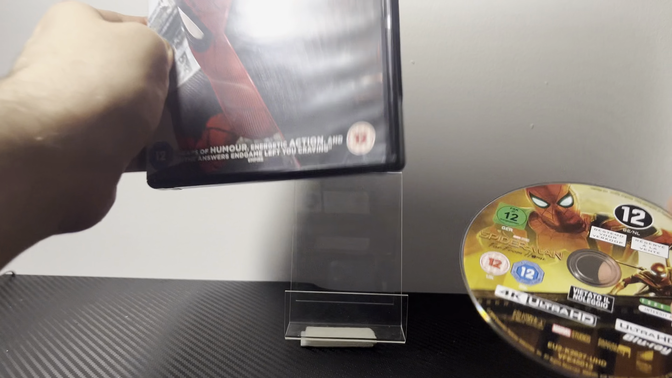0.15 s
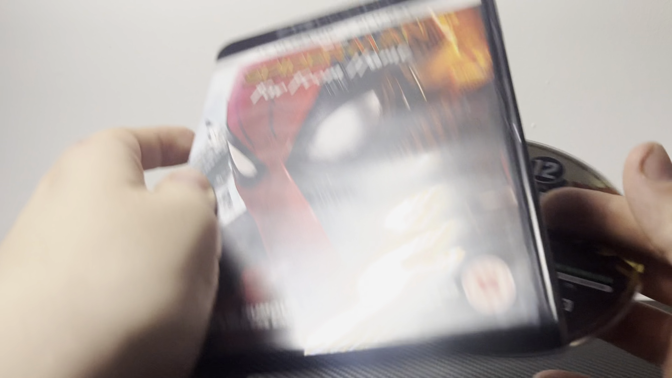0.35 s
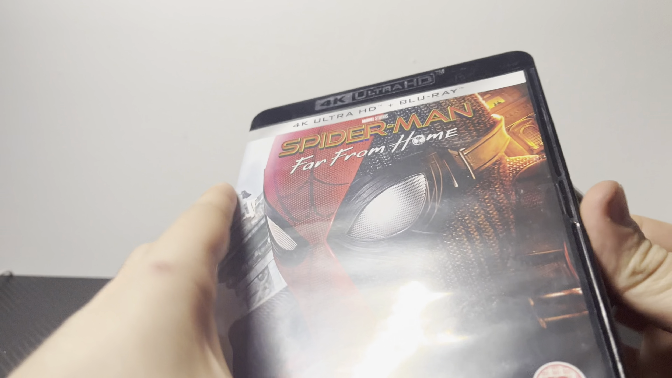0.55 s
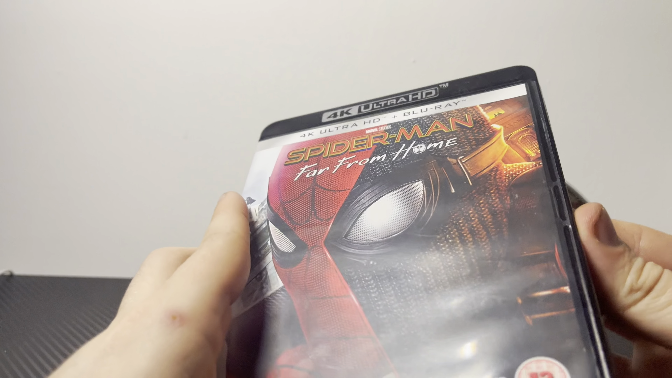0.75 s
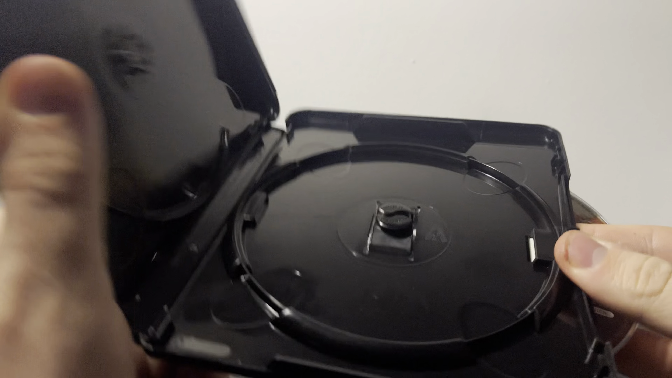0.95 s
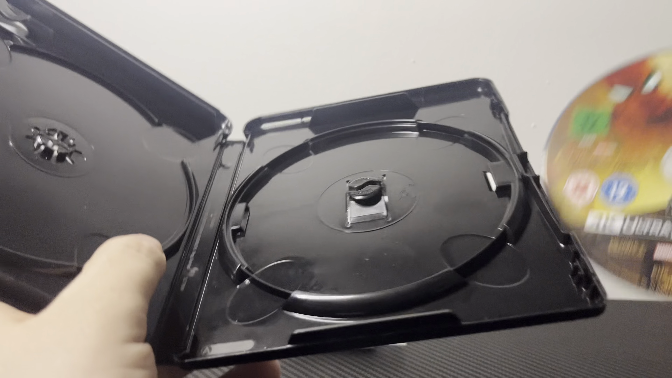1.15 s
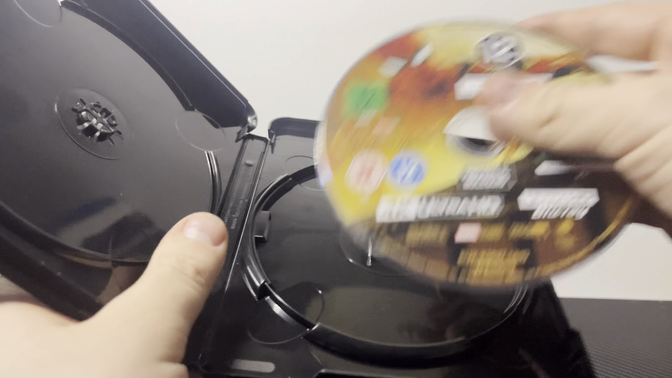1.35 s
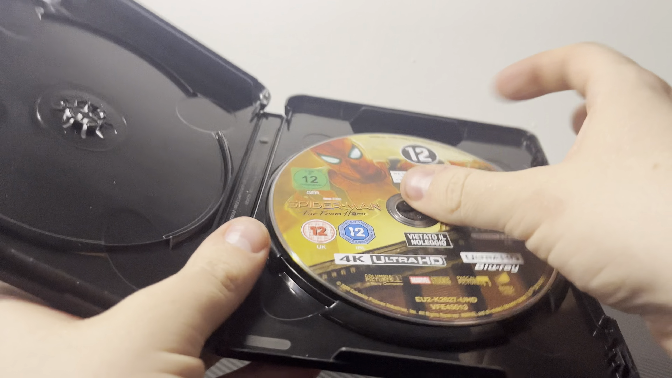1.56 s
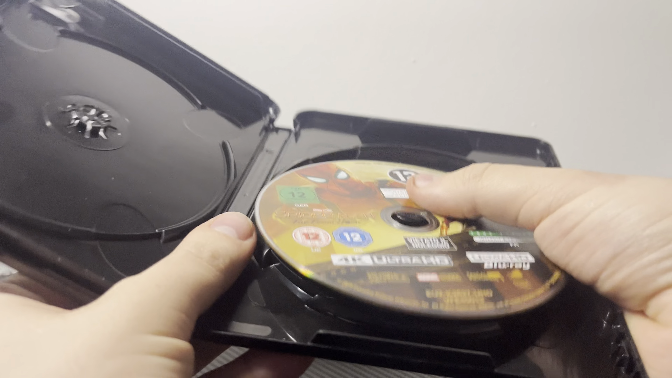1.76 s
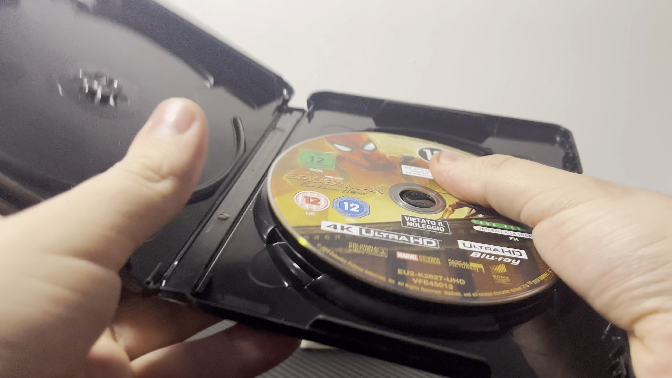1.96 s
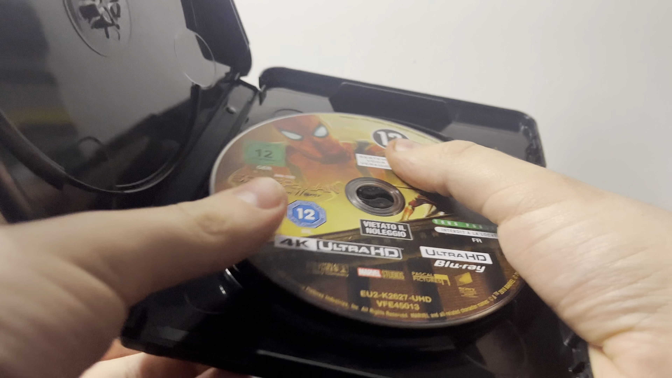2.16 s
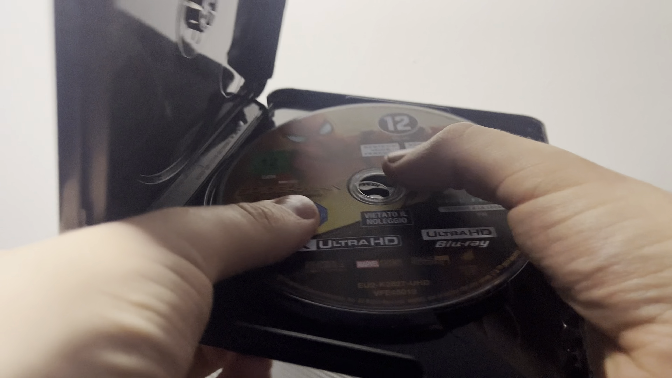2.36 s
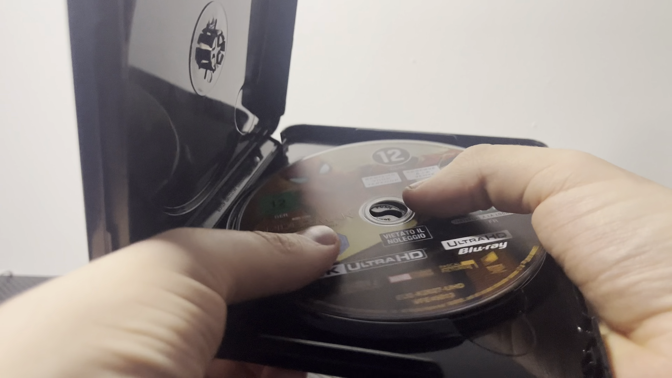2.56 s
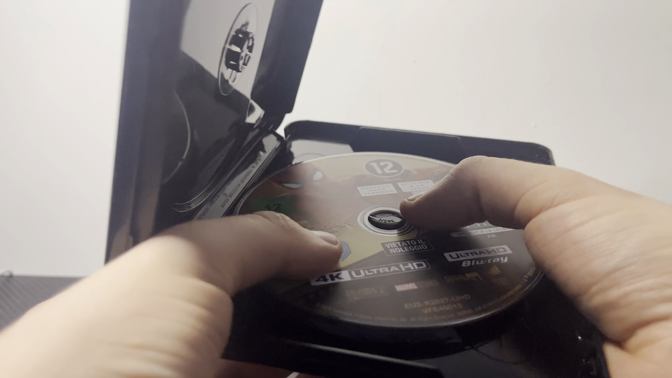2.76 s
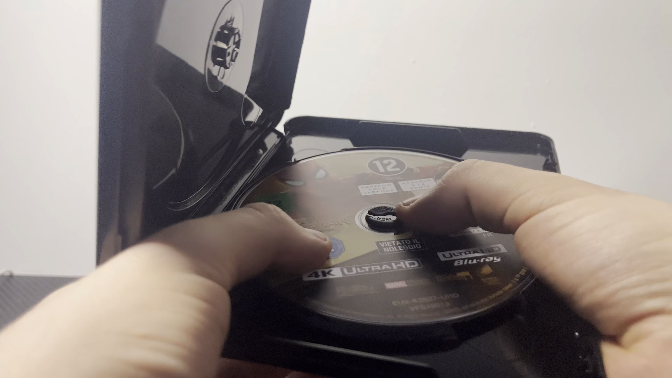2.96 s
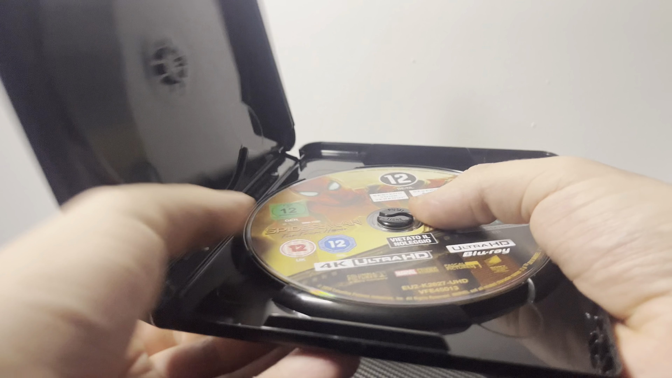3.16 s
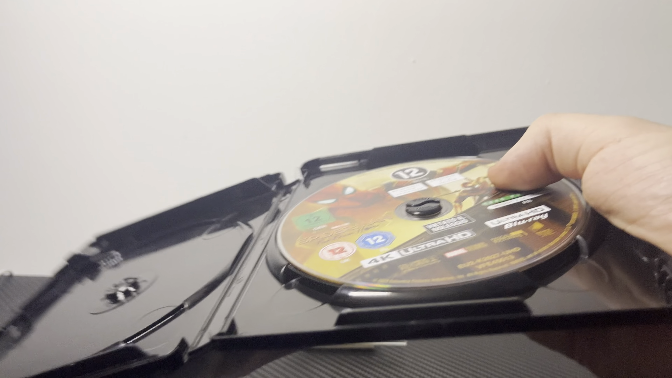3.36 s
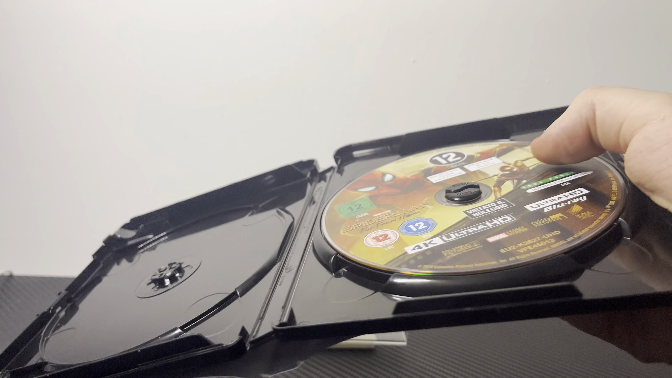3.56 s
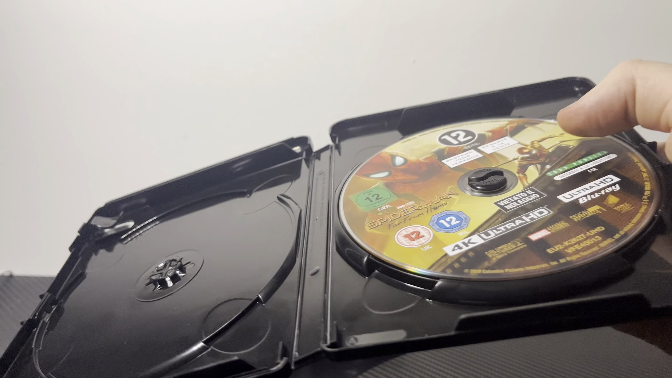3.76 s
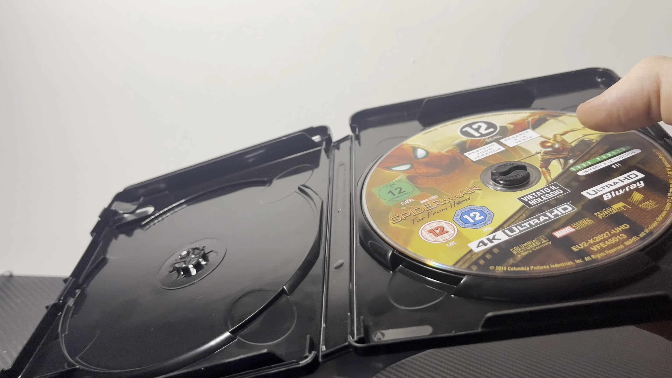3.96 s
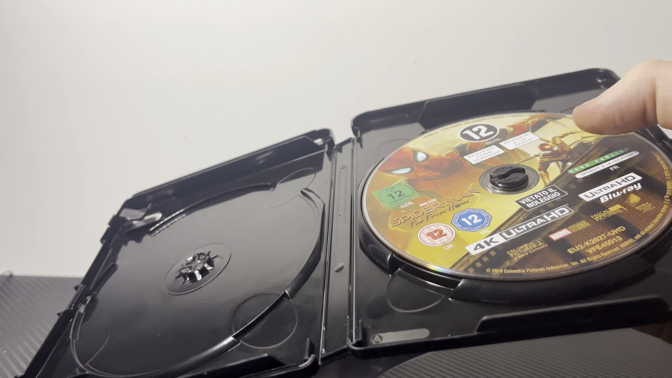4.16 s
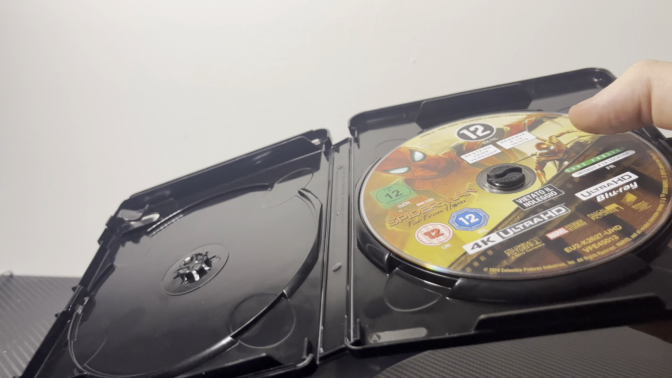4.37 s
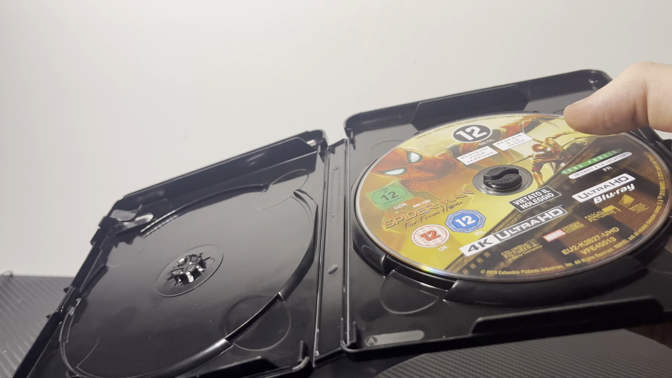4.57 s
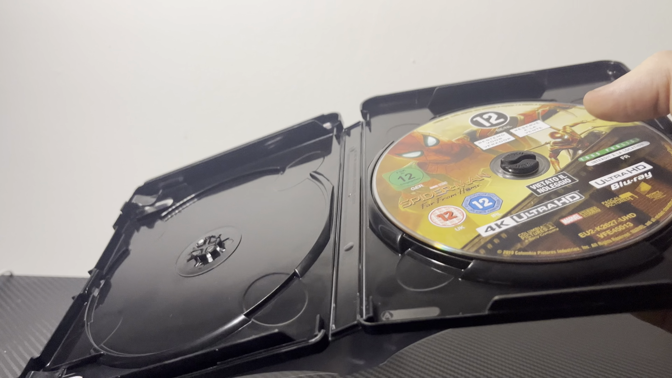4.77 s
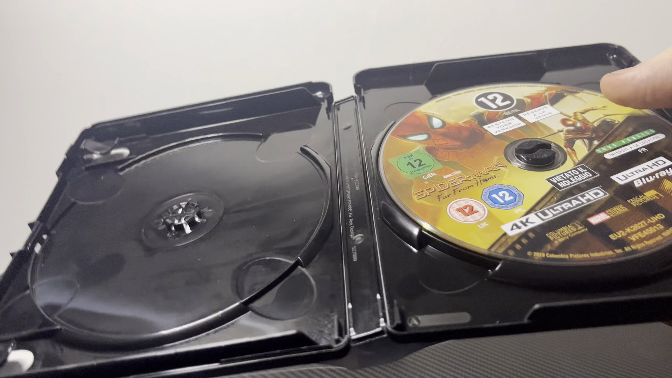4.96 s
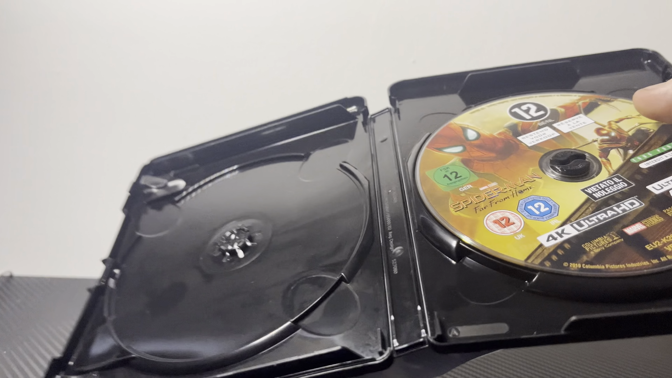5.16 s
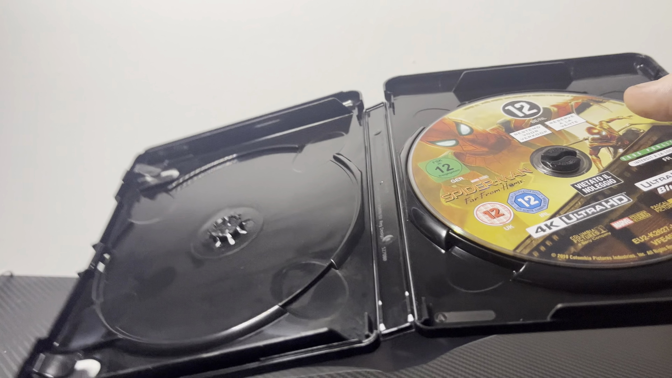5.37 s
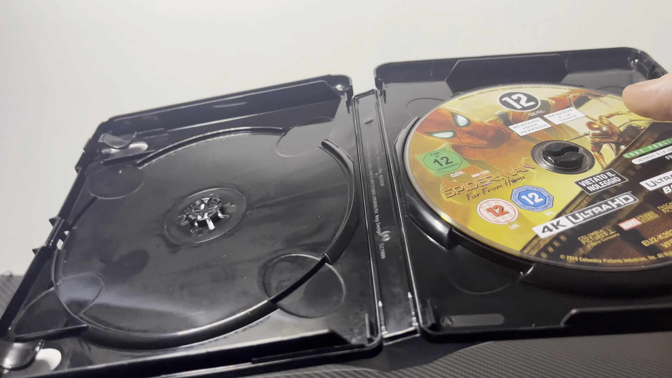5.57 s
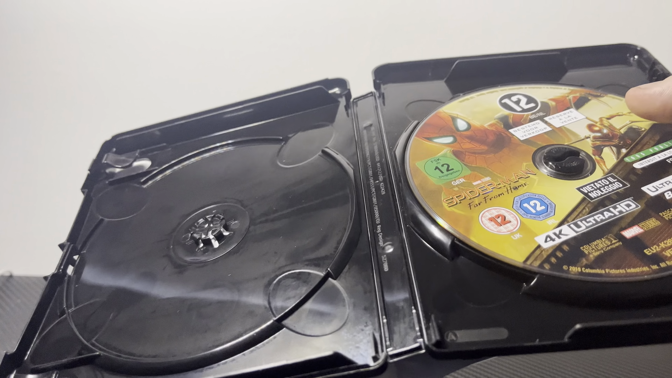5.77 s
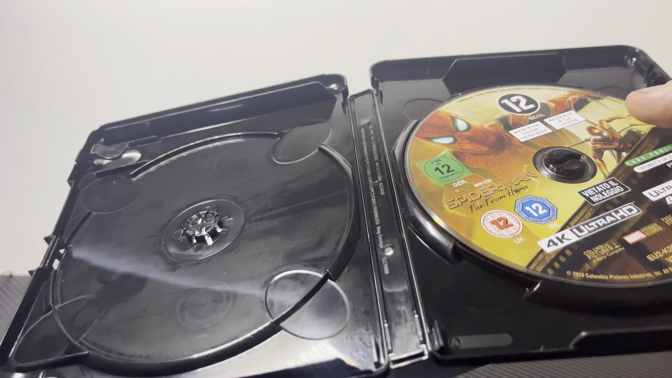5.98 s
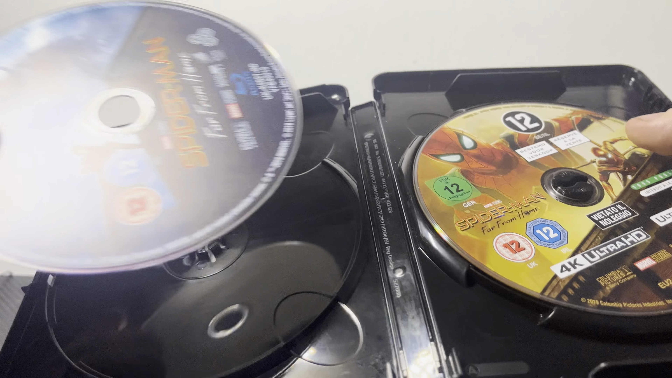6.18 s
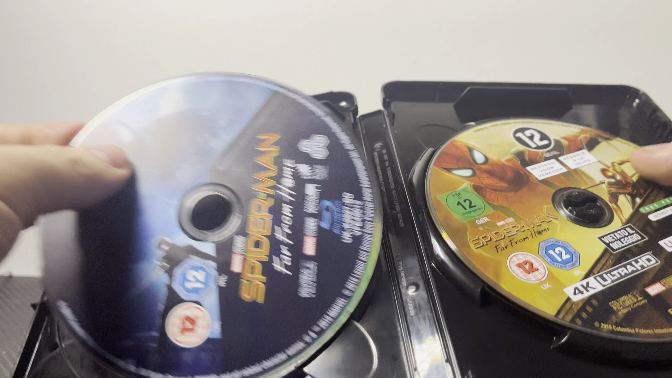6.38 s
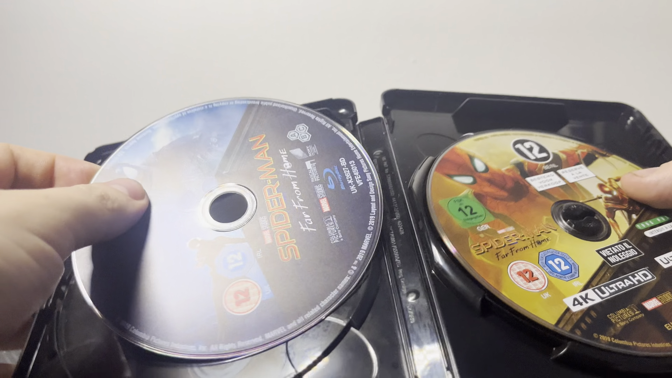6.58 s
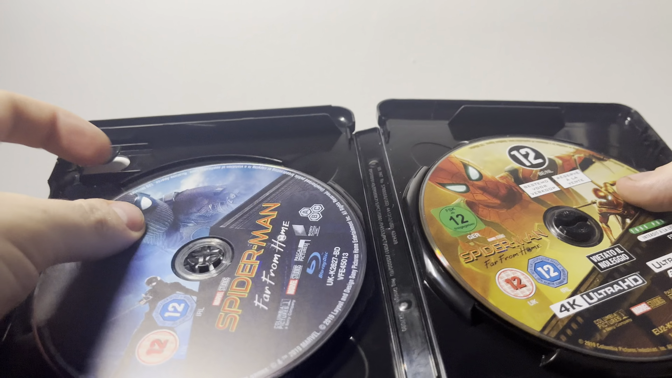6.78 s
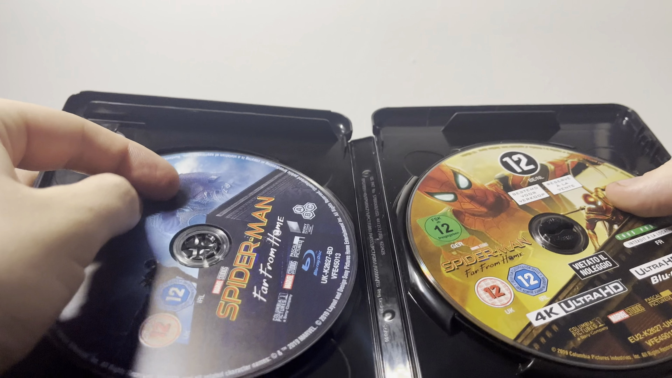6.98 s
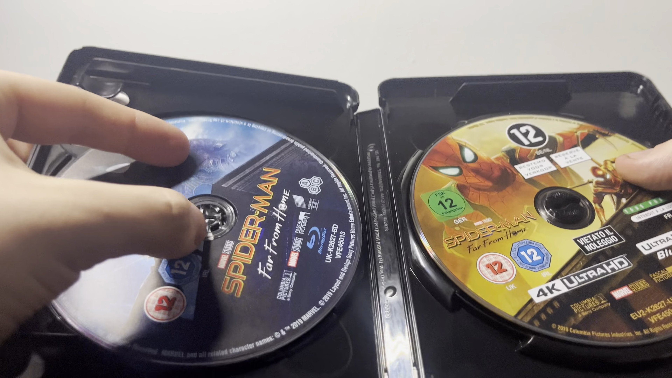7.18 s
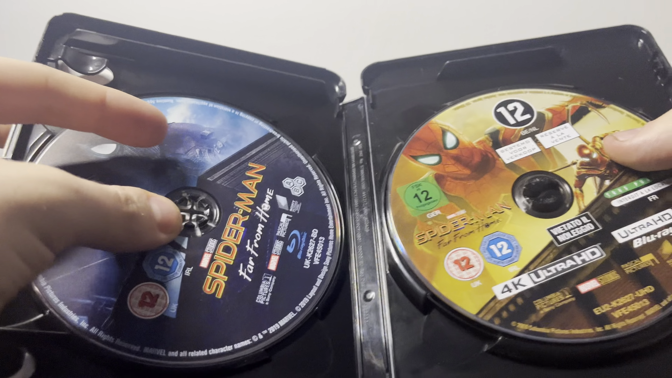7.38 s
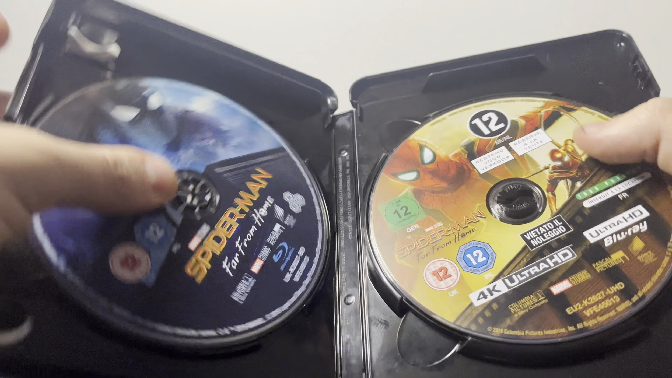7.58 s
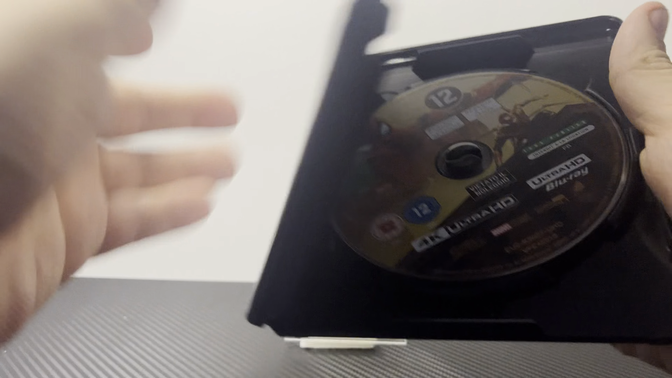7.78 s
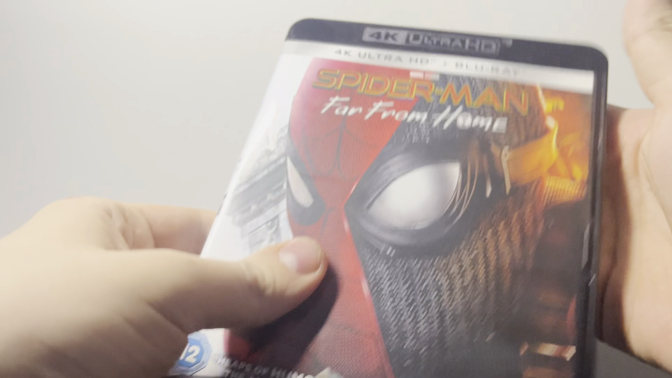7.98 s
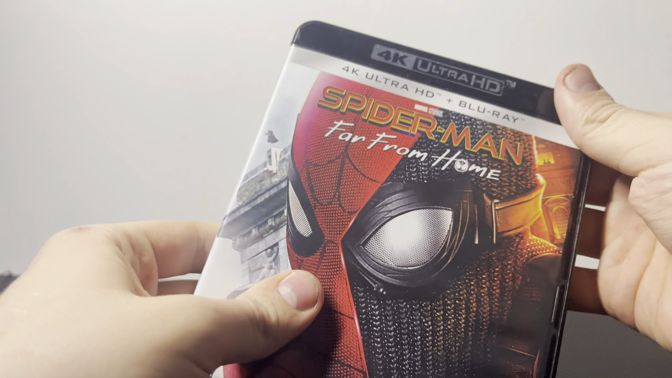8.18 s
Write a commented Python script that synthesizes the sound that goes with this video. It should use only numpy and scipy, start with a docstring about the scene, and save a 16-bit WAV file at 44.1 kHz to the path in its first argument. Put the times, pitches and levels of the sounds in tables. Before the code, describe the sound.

A quiet indoor room with low hum, soft hiss and barely audible fuzzy whistles near the start. Close to a stereo microphone, slightly left-heavy, hands bump and rub a thin plastic case at 0.4-1.0 s, with small clicks. Sharp cracks at 1.4-1.5 s open it, followed by taps and a firm click near 1.95. Rubbing and bright clicks at 2.2-2.8 lead to the loudest brittle snap at 2.9 as a disc seats. It calms until about 4.4, with faint rustle, a scrape and dull bumps. Fumbling knocks run 4.4-5.8, with a strong clack at 4.84, low thumps around 5 and a click at 5.76. The second disc clacks at 6.3-6.4, rattles at 6.7, and snaps in at 7.3-7.37. After light rubbing, the case shuts with a hard double click at 7.95, then small taps fade by 8.2. Snaps have short, sparse room tails.

```python
"""Quiet-room hum and hiss with faint fuzzy whistles; then hands open a plastic disc case, press two discs
onto their hubs and shut it, close to a two-port microphone. Each click is a burst of tiny slips ringing
the thin case; fingers rub (clumped slips), bump (low swings) and rustle (fluttering noise) between them.
The room answers each snap with a short tail of sparse taps."""
import sys
import numpy as np
from scipy import signal
from scipy.fft import rfft, irfft
from scipy.io import wavfile
from scipy.ndimage import uniform_filter1d

SR = 44100
rng = np.random.default_rng(int(sys.argv[2]) if len(sys.argv) > 2 else 0)


def to_linear_factor(level_db):
    """Convert decibel levels (scalar or array-like) to linear amplitude factors."""
    exponent = np.asarray(level_db, float) / 20
    return 10 ** exponent


def wav_out(sig):
    """Save sig, one row per channel (or a flat mono array), as 16-bit PCM at SR to the path in sys.argv[1]."""
    wavfile.write(sys.argv[1], SR, np.round(np.clip(np.atleast_2d(sig).T, -1, 1) * 32767).astype(np.int16))


N = 363031  # length in samples


def evened(x):
    """Scales to rms 1."""
    return x / np.sqrt(np.mean(x ** 2) + 1e-20)


def peaked(x):
    """Scales to peak 1."""
    return x / (np.max(abs(x)) + 1e-20)


def read(points, hz):
    """Reads a spectrum on a log-frequency axis."""
    f, value = np.transpose(points)
    return np.interp(np.log(hz + 1), np.log(f + 1), value)


def coloured(x, points):
    """Filters by a spectrum in dB."""
    hz = np.fft.rfftfreq(x.shape[-1], 1 / SR)
    return irfft(rfft(x) * to_linear_factor(read(points, hz)), x.shape[-1])


def along(curve):
    """Reads a curve over time at every sample."""
    return np.interp(np.arange(N) / SR, *np.transpose(curve))


def drift(samples):
    """Slow random motion of rms 1: noise averaged twice over a number of samples."""
    return evened(uniform_filter1d(uniform_filter1d(rng.standard_normal(N), samples), samples))


def add(mix, s, sound):
    """Mixes a sound in at time s."""
    part = mix[round(s * SR):][:len(sound)]
    part += sound[:len(part)]


# deep rumble of the room over time: (t/s, level/dB)
RUMBLE_LEVEL = [(0.0, -60), (0.5, -59), (4.72, -70), (4.97, -52), (7.08, -79), (8.23, -61.5)]


def rumble(low_hz=30, high_hz=55):
    """A deep rumble of filtered noise, the same at both ports."""
    spectrum = [(low_hz / 2, -20), (low_hz, 0), (high_hz, -6), (high_hz * 2, -50)]
    noise = coloured(rng.standard_normal(N), spectrum)
    return to_linear_factor(along(RUMBLE_LEVEL)) * evened(noise)


# spectrum of the room noise, before it is set to its overall level: (f/Hz, relative level per Hz/dB)
AIR_SPECTRUM = [(15, -39.5), (25, -3), (60, 1), (127, -4.5), (217, -10), (270, -11), (451, -7.5),
                (531, -24.5), (659, -9.5), (936, -18), (1150, -22.5), (1560, -25), (1790, -29.5),
                (5000, -54.5), (16000, -92)]
# faint steady tones: (f/Hz, rms level/dB)
HUM_TONES = [(200, -64.5), (643, -75.5)]
# diffuse sound at the two ports: (f/Hz, left-right likeness from 0 to 1)
PORT_LIKENESS = [(40, .95), (130, .8), (290, .5), (640, 0), (8000, 0), (15000, .45)]


def air(noise_db=-52.5, waver_rad=0.64):
    """Room noise, most alike at both ports in the bass, with a few faint tones of wavering phase."""
    hz = np.fft.rfftfreq(N, 1 / SR)
    same = np.clip(read(PORT_LIKENESS, hz), -1, 1)
    a, b = rfft(rng.standard_normal((2, N)))
    pair = np.array([a, same * a + np.sqrt(1 - same ** 2) * b])
    noise = to_linear_factor(noise_db) * evened(irfft(pair * to_linear_factor(read(AIR_SPECTRUM, hz)), N))
    t = np.arange(N) / SR
    waver = waver_rad * drift(6000)
    hum = sum(to_linear_factor(db) * np.sqrt(2) * np.sin(2 * np.pi * f * t + waver) for f, db in HUM_TONES)
    return noise + hum


# faint fuzzy whistles: (start t/s, length t/s, level before the fades/dB, from f/Hz, to f/Hz)
WHISTLES = [(0.0, 0.18, -79, 12100, 9500), (0.097, 0.081, -70, 2820, 2830), (0.268, .1, -69, 3800, 3540),
            (3.362, 0.069, -70, 4900, 4800)]


def swishes(width_hz=300):
    """Faint narrow whistles that glide: a carrier blurred by slow noise."""
    out = np.zeros(N)
    for s, length, db, from_hz, to_hz in WHISTLES:
        glide_hz = np.linspace(from_hz, to_hz, round(length * SR))
        phase = 2 * np.pi * np.cumsum(glide_hz) / SR
        a, b = uniform_filter1d(rng.standard_normal((len(phase), 2)), round(SR / width_hz), axis=0).T
        whistle = evened(a * np.cos(phase) + b * np.sin(phase))
        add(out, s, to_linear_factor(db) * whistle * np.hanning(len(phase)) ** .5)
    return out


# whisper of the hands over time, also guiding the crackle: (t/s, level/dB)
RUSTLE_LEVEL = [(0.0, -86.5), (0.75, -90), (0.98, -71.5), (1.15, -97), (1.35, -83.5), (1.63, -74),
                (2.01, -89), (2.45, -79), (3.299, -85.5), (3.671, -80), (3.83, -76), (4.22, -86),
                (4.58, -81), (5.82, -77.5), (6.201, -89.5), (6.699, -78.5), (7.13, -86.5), (7.88, -84),
                (8.23, -87.5)]
# treble colour of plastic and skin, shared by rustle, rubs and clicks: (f/Hz, relative level per Hz/dB)
TICK_SPECTRUM = [(1500, -39), (4410, 4.5), (6500, -0.5), (7770, -5.5), (9040, -7), (11000, 3),
                 (14000, -6.5), (16000, -48.5)]


def rustle(flutter_db=3.0, body_hz=3000, body_db=7.0):
    """Sleeves and skin never rest: a faint, fluttering whisper of noise."""
    level_db = along(RUSTLE_LEVEL) + flutter_db * drift(500)
    noise = rng.standard_normal(N)
    body = coloured(noise, [(body_hz / 4, -24), (body_hz, 0), (body_hz * 2, -5), (body_hz * 4, -40)])
    return to_linear_factor(level_db) * (evened(coloured(noise, TICK_SPECTRUM)) + to_linear_factor(body_db) * evened(body))


def ringing(modes, t, extra_db, detune):
    """The dying tones of a set of modes, one blow; the grip shifts each a little."""
    hz, db, t60 = np.transpose(modes)[:, :, None]
    tones = np.sin(2 * np.pi * hz * (1 + detune[:, None]) * t)
    decay_db = -60 * t / np.maximum(t60, .003)
    return (to_linear_factor(db + extra_db[:, None] + decay_db) * tones).sum(0)


# modes of the thin shell, before the grip shifts them: (f/Hz, level/dB, t60/s)
SHELL_MODES = [(883, 2, 0.061), (1100, -19, 0.012), (1390, 1.5, 0.0075), (1530, -1, 0.017),
               (2110, 1, 0.0074), (2386, -5, 0.0047), (2700, -2, 0.014), (3200, 0, 0.025),
               (3940, 1.5, 0.0079), (3910, 9, 0.01), (4580, -1, 0.0067), (4980, 8.5, 0.016),
               (5820, 8, 0.0058), (6600, 12.5, 0.0031)]


def struck(slips, hz, spread_octaves=2.6, spot_db=-6.5, uneven_db=3, grip=0.086, spot_cycles=26, widen=0.12):
    """Slips ring the touched spot and the modes near it, together with a dry broad crack."""
    t, shell_hz = np.arange(2048) / SR, np.transpose(SHELL_MODES)[0]
    # low spots ring fewer modes, and more on their own
    spread_octaves = spread_octaves * (hz / 2000) ** widen
    spot_db = spot_db - 3 * np.log2(hz / 2000)
    a, b = rng.standard_normal((len(SHELL_MODES), 2)).T
    near_db = -6 * (np.log2(shell_hz / hz) / spread_octaves) ** 2 + uneven_db * a
    ring = signal.fftconvolve(slips, ringing(SHELL_MODES, t, near_db, grip * b))[:len(slips)]
    octaves = np.log2((np.fft.rfftfreq(len(slips), 1 / SR) + 1) / hz)
    crack = irfft(rfft(slips) * to_linear_factor(-6 * (octaves / spread_octaves) ** 2), len(slips))
    # the spot's own tone drops 60 dB in spot_cycles cycles
    spot_tone = np.sin(2 * np.pi * hz * t) * to_linear_factor(-60 * t * hz / spot_cycles)
    spot = signal.fftconvolve(slips, spot_tone)[:len(slips)]
    return evened(ring) + to_linear_factor(spot_db) * evened(spot) + to_linear_factor(-1) * evened(crack)


def crackle(per_s=25, crackle_db=23, size_db=5.0):
    """Small stray ticks: short noise bursts ring the shell, louder when the hands are busy."""
    t = np.arange(512) / SR
    size = size_db * np.minimum(rng.exponential(1, N), 4)
    hits = rng.random(N) < per_s / SR
    when = to_linear_factor(along(RUSTLE_LEVEL) + crackle_db + size) * hits
    kind, out = rng.integers(0, 6, N), np.zeros(N)
    for k, hz in enumerate(np.geomspace(1200, 5500, num=6)):
        burst = rng.standard_normal(len(t)) * np.exp(-t / 0.003)
        out += signal.oaconvolve(when * (kind == k), peaked(struck(burst, hz)))[:N]
    return out


# low bumps: (t/s, peak level/dB, f/Hz)
BUMPS = [(0.431, -31.5, 98.7), (0.498, -35, 46), (1.549, -37.5, 60), (2.241, -39, 68),
         (2.419, -35.5, 101.6), (3.296, -42.5, 75.7), (3.863, -39, 92.5), (3.968, -34.5, 105),
         (4.392, -40, 70.7), (4.804, -40.5, 72), (4.974, -31.5, 91), (5.015, -31, 174), (5.193, -33, 106),
         (5.763, -38, 70.3), (7.668, -42, 63), (7.856, -34.5, 105.3), (7.961, -35, 86.4)]


def thumps(rise_s=0.0025, t60_s=0.15):
    """Hands and case bump the table top, which gives a few low uneven swings."""
    t, out = np.arange(SR // 2) / SR, np.zeros(N)
    for s, db, hz in BUMPS:
        overtone = np.sin(2 * np.pi * (1.733 * hz * t + rng.random()))
        swing = np.sin(2 * np.pi * hz * t) + .5 * overtone
        envelope = (1 - np.exp(-t / rise_s)) * to_linear_factor(-60 * t / t60_s)
        add(out, s, to_linear_factor(db) * peaked(swing * envelope))
    return out


# rubs and scrapes: (start t/s, length t/s, body level before the fades/dB, centre f/Hz,
# treble level against the body/dB)
RUBS = [(0.42, .22, -63, 1320, -10), (0.657, 0.054, -47, 925, -19), (0.806, 0.055, -41.5, 1270, -25),
        (0.961, 0.093, -52.5, 4650, -0.5), (1.017, 0.16, -59.5, 1750, -5), (1.418, 0.19, -42.5, 2920, -29),
        (1.524, 0.18, -51.5, 2530, -31), (1.709, 0.15, -51, 2300, -27), (1.877, 0.06, -54, 1740, -12),
        (2.097, 0.13, -54, 3650, -11), (2.271, 0.14, -44.5, 2600, -19), (2.546, 0.15, -49.5, 2860, -24),
        (2.712, 0.069, -54.5, 2100, -21), (2.804, 0.012, -42.5, 2240, -9), (2.836, 0.14, -51.5, 1900, -37),
        (3.118, 0.068, -60, 2110, -6), (3.172, 0.12, -49.5, 4970, 1), (3.176, 0.1, -49, 1150, -20),
        (3.267, 0.1, -59, 1770, -14), (3.69, 0.11, -56.5, 2050, -26), (3.772, 0.17, -49.5, 1000, -13),
        (3.91, 0.19, -58, 1940, -15), (4.279, 0.061, -52.5, 1260, -10.5), (4.344, 0.29, -51, 1440, -7.5),
        (4.788, 0.16, -42.5, 1250, -14), (5.006, 0.091, -40, 3320, -36), (5.085, 0.064, -47.5, 1980, -37),
        (5.163, 0.058, -54.5, 1560, -32), (5.244, 0.11, -44, 1170, -11), (5.347, 0.081, -45, 1840, -7.5),
        (5.51, 0.054, -48, 3700, -17), (5.605, 0.054, -50.5, 2700, -33), (5.698, 0.12, -51.5, 1480, -11),
        (5.922, 0.071, -57, 2110, -4.5), (6.314, 0.096, -47.5, 2700, -19), (6.415, 0.092, -48, 2080, -14),
        (6.544, 0.064, -52, 1840, -11), (6.697, 0.06, -37, 3300, -7), (6.834, 0.062, -51, 2340, -13),
        (7.558, 0.079, -58, 2480, -10), (7.614, 0.12, -55.5, 1000, -8), (7.841, 0.14, -45.5, 1360, -8),
        (7.959, 0.11, -43, 1580, -10), (8.036, 0.045, -46, 1900, -17), (8.167, 0.072, -56, 1270, -31)]


def hands(slips_per_s=3000, size_db=1.5, clump_db=3.5, octaves=1.32, spot_db=-7, smooth=.4, soft_ends=0.6):
    """Clumped tiny slips of skin and plastic sliding on plastic, over a share of smooth noise."""
    clumps = drift(200)
    sizes = to_linear_factor(size_db * np.minimum(rng.exponential(1, N), 4))
    signs = rng.choice([-1., 1.], N)
    slips = evened(sizes * signs * (rng.random(N) < slips_per_s / SR))
    slips = to_linear_factor(clump_db * clumps) * (slips + smooth * rng.standard_normal(N))
    out = np.zeros(N)
    for s, length, db, hz, treble_db in RUBS:
        stroke = slips[round(s * SR):][:2 * round(length * SR / 2)]
        body = evened(struck(stroke, hz, octaves, spot_db))
        treble = evened(coloured(stroke, TICK_SPECTRUM))
        fades = signal.windows.tukey(len(stroke), soft_ends)
        add(out, s, to_linear_factor(db) * (body + to_linear_factor(treble_db) * treble) * fades)
    return out


# modes of the case's panels, before the grip shifts them: (f/Hz, level/dB, t60/s)
PANEL_MODES = [(107, -1, 0.29), (228, 8.5, 0.029), (325, 8, 0.035), (525, -2, 0.025)]
# clicks and snaps: (t/s, peak level of the ringing/dB, centre of the ringing f/Hz,
# panel thud level against the ringing/dB, sharp tick level against the ringing/dB, typical slip time/ms)
SNAPS = [(0.421, -36, 2160, -3.5, -4.5, 6.3), (0.464, -38, 1900, -9, -17, 3.9),
         (0.537, -52, 5500, -30, 3, 1.7), (0.5507, -45, 900, -7, 5, 2.4), (0.659, -43, 1960, -7, -22, 2.5),
         (0.781, -31.5, 790, -12, -24, 10.4), (0.805, -30.5, 1220, -27, -22, 5),
         (0.821, -27, 1990, -28, -19, 1.5), (0.836, -28, 2340, -37, -15, 2.2),
         (1.003, -27.5, 5950, -13, -11, 2.8), (1.0889, -42.5, 1400, -12, -5, 2.3),
         (1.4328, -14, 3190, -20, -14, 1.45), (1.482, -14.5, 1190, -30, -22, 1.09),
         (1.5274, -12, 3520, -16, -7.5, 2.4), (1.5356, -23, 3160, -12, -18, 2),
         (1.5766, -25.0, 1270, -5.5, -15, 2.4), (1.602, -29.5, 3080.0, -31, -13.0, 3.3),
         (1.634, -27, 2940, -33, -18, 1.6), (1.645, -30, 920, -35, -14, 1.7),
         (1.7496, -25, 1420, -19, -11, 6.3), (1.7579, -35, 910, -20, -22, 16),
         (1.7808, -20.5, 3500, -13, 0, 1.4), (1.82, -41, 2100, 6, -2, 3.5),
         (1.825, -32.5, 4000, -25, 1, 1.1), (1.8425, -33, 2580, -11, -26, 2.5),
         (1.934, -28, 2950, -2, -27, 1.4), (1.945, -13, 2140, -21, -20.5, 1.84),
         (2.203, -31.5, 2520, -22, -11, 5.6), (2.2323, -19, 4370.0, -37, -11, 0.69),
         (2.2364, -22.5, 3030.0, -39, -1.5, 3), (2.301, -29, 1260, -42, 5, 3.9),
         (2.3426, -16.5, 3200, -18.5, 0.5, 2.2), (2.5333, -35, 3300, -24, -8, 6.2),
         (2.615, -22.5, 3230, -14, -42, 1.6), (2.648, -29.5, 3250, -13, -48.0, 2.4),
         (2.817, -24, 3220, -16, -43.5, 1.8), (2.9108, -13.5, 1360, -40, -2.5, 1.3),
         (2.9138, -7, 3600, -23.5, -8, 4), (2.9246, -3.5, 3140, -23, -15, 1.3),
         (2.9271, -5, 2800, -29.5, -31, 1.9), (3.728, -32, 3300, -5.5, -46, 7.3),
         (3.952, -24, 2750, -5.5, -23, 13), (4.432, -36, 5400, -10, -6, 2.2),
         (4.579, -23.5, 1550, -33, -15, 7.4), (4.6, -24.5, 1280, -38, -7.5, 5.8),
         (4.671, -30, 4300, -26.0, -10, 2.8), (4.677, -22, 3800, -22, -10, 3.3),
         (4.6904, -27, 780, -34, -2, 8.7), (4.835, -9, 3860, -18.5, -8, 2.9),
         (4.8592, -20.5, 1550, -10, -1, 4.2), (4.9357, -27, 3900.0, -6.5, 2, 2.9),
         (4.9681, -28.5, 1470, 3, -16, 8.9), (4.994, -29.5, 1720, -1, -10, 5.7),
         (5.0145, -29, 1590, 10, -11, 3), (5.0446, -23.5, 3560, -9.5, -48, 5.5),
         (5.058, -32, 5300.0, -28, -45, 7.1), (5.2657, -35, 860, -5, -31.5, 1.8),
         (5.385, -30, 1780, -9, -24, 5.3), (5.4217, -27, 5000, -8.5, -23, 1.8),
         (5.445, -33.5, 4830, -4, -37, 1.9), (5.519, -25.5, 3700, -22, -26, 2.3),
         (5.542, -21.5, 3900, -13.5, -8, 1.6), (5.6004, -32, 3230, -3, -5, 9.1),
         (5.757, -16.5, 2920, -18.5, -17.5, 3.6), (6.328, -9, 3710, -15.5, -10.5, 0.97),
         (6.339, -23, 2570, -31, -20, 3.4), (6.353, -25.5, 3000.0, -17, -18, 1.8),
         (6.409, -9.5, 1970, -40, -30.5, 1.86), (6.4643, -27, 1730, -18, -5.5, 2.7),
         (7.17, -57, 5960, -36, 6, 1.7), (6.6374, -37, 950, -13, -2, 0.79),
         (6.711, -25, 1800, -9, -12, 3.3), (6.7233, -18.5, 3200, -13.5, -1.5, 4),
         (6.729, -18, 3680, -6.5, -11, 4.8), (6.8312, -25, 3640, -9, -0.5, 2.4),
         (6.859, -36, 1390.0, -21, -21, 3.2), (7.018, -50, 3360, -29, 0, 3.1),
         (7.137, -51.5, 3700.0, -16, -4, 2.7), (7.1846, -36, 1050, -34, -1, 3.3),
         (7.3018, -30.5, 3260.0, -30, -15, 4.1), (7.3107, -9.5, 4100, -5.5, -6.5, 5),
         (7.36, -13.5, 1680, -15, -11, 4.9), (7.3675, -6.0, 2043, -28, -8, 1.6),
         (7.569, -41, 3500.0, -11, 1.5, 4.3), (7.637, -39.5, 3070, 1.5, -21, 4.8),
         (7.661, -33.5, 917, -14, -6, 9.8), (7.745, -36.5, 3100, -15, -32, 3.7),
         (7.8546, -45, 2980, 4, 10, 1.3), (7.865, -32.5, 980, -7, -0.5, 2.1),
         (7.93, -22.5, 4160, -11, -30.0, 3.4), (7.9415, -8, 3010, -48, -25, 1.2),
         (7.9504, -6.5, 2590, -16, -21, 3.3), (7.978, -19, 1260, -5, -5.5, 3.5),
         (8.0466, -30.5, 1360, -29.0, -24, 2.1), (8.0957, -31, 1320, -15, -11, 5.1),
         (8.151, -30, 1160, -30, -10, 4.8)]


def clicks(uneven_db=3, grip=0.13, rise=0.28, tick_share=1.0, slip_db=2.5, octaves=1.73, spot_db=0):
    """A short burst of slips rings the shell, pushes the panels and ticks."""
    t, out = np.arange(4096) / SR, np.zeros(N)
    push = np.gradient(t * np.exp(-1000 * t / 0.4))  # the soft shove of the whole case
    fade = signal.windows.tukey(2 * len(t), .3)[len(t):]
    lead_s = .005  # silence ahead of the slips
    for s, db, hz, low_db, high_db, slip_ms in SNAPS:
        # every slip time is a little uneven
        ms = max(slip_ms, .3) * np.exp(0.079 * rng.standard_normal())
        u = np.maximum(1000 * (t - lead_s) / ms, 0)  # time in slip times
        size, sign = rng.standard_normal((len(t), 2)).T
        burst = (1 - np.exp(-u / rise)) ** 2 * (np.exp(-u) + 0.15 * np.exp(-u / 3))
        slips = sign * to_linear_factor(slip_db * size) * burst
        a, b = rng.standard_normal((len(PANEL_MODES), 2)).T
        panels = ringing(PANEL_MODES, t, uneven_db * a, grip * b)
        thud = peaked(signal.fftconvolve(push, panels)[:len(t)])
        ring = peaked(struck(slips, hz, octaves, spot_db))
        tick = peaked(coloured(slips * np.exp(-u / tick_share), TICK_SPECTRUM))
        add(out, s - lead_s, to_linear_factor(db) * (ring + to_linear_factor(high_db) * tick))
        add(out, s, to_linear_factor(db + low_db) * thud * fade)
    return out


# level of the highest treble, lower while the hand works aside: (t/s, level/dB)
TOP_LEVEL = [(0, 0), (3.4, -1.5), (3.7, -13.5), (5.8, -11), (6.2, 1.5), (8.23, -4.5)]


def hand_aside(near):
    """Turns the highest treble of the near sounds up and down over time."""
    top = coloured(near, [(8000, -27.0), (11000, 1.0)])
    return near + (to_linear_factor(along(TOP_LEVEL)) - 1) * top


# decay of the room by band: (f/Hz, t60/s)
ROOM_DECAY = [(100, 0.44), (500, 0.22), (2000, 0.25), (5000, 0.25), (10000, 0.17), (16000, 0.22)]


def tail():
    """Sparse taps of random sign, each band dying at its own speed, other taps at each port."""
    taps = np.zeros((2, SR // 2))
    jitter = rng.integers(0, 20, (2, (SR // 2 - 201) // 20))
    at = np.arange(200, SR // 2 - 20, 20) + jitter  # one tap in every 20 samples
    np.put_along_axis(taps, at, rng.choice([-1., 1.], at.shape), 1)
    hz, t, z = signal.stft(taps, SR, nperseg=256)
    decay = to_linear_factor(-60 * t / read(ROOM_DECAY, hz)[:, None])
    echo = signal.istft(z * decay, SR, nperseg=256)[1]
    return echo / np.linalg.norm(echo[0])


def room(x):
    """The case sounds different in each direction: three noise-blurred trebles feed three echo patterns."""
    treble = coloured(x, [(500, -40), (1300, 0)])
    out = 0
    for _ in range(3):
        blur = .6 + .8 * evened(uniform_filter1d(rng.standard_normal(N), size=30))
        sent = x - treble + treble * blur
        out = out + signal.fftconvolve(sent[None], tail(), axes=1)[:, :N]
    return out / np.sqrt(3)


# where the hands are: (t/s, left over right level/dB)
HANDS_SIDE = [(0.0, 9.5), (0.87, 0.5), (0.98, 4.5), (6.899, 6.5), (8.23, 3)]
# direct sound: (f/Hz, phase by which the left port leads/rad)
LEFT_LEAD = [(60, .25), (300, .55), (700, 1.35), (5000, 1.5), (13000, 1.05)]


def ports(x):
    """The direct sound reaches the two ports at different level and phase."""
    phase = np.outer([.5, -.5], read(LEFT_LEAD, np.fft.rfftfreq(N, 1 / SR)))
    pair = irfft(rfft(x) * np.exp(1j * phase), N)
    return pair * to_linear_factor(np.outer([.5, -.5], along(HANDS_SIDE)))


def scene():
    """Case and hands, direct and through the room, over the room noise."""
    near = hand_aside(clicks() + hands() + rustle() + crackle() + swishes())
    direct = ports(near + thumps())
    return direct + to_linear_factor(-11.0) * room(near) + air() + rumble()


# colour of the ports: (f/Hz, left over right level/dB)
LEFT_COLOUR = [(60, -2), (300, -1), (3000, 1), (6000, 1.5), (10000, -3.5)]


def microphone(dry):
    """The ports differ in colour; the microphone drops deepest bass and highest treble."""
    hz = np.fft.rfftfreq(N, 1 / SR)
    band = 1 / np.sqrt((1 + (40 / (hz + 1)) ** 10) * (1 + (hz / 14600) ** 40))
    colour = to_linear_factor(np.outer([.5, -.5], read(LEFT_COLOUR, hz)))
    return irfft(rfft(dry) * colour * band, N)


def top_cut(x):
    """Nothing passes above the cut-off."""
    return signal.sosfilt(signal.butter(12, 16470, fs=SR, output="sos"), x)


def record(dry):
    """Takes the scene through the microphone to the finished stereo sound."""
    mix = microphone(dry)
    return top_cut(mix)


dry = scene()
out = record(dry)
wav_out(out)
```